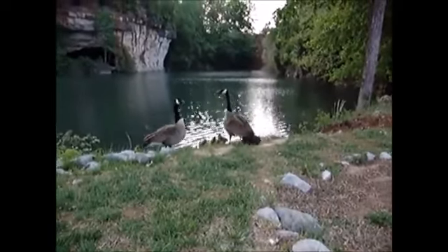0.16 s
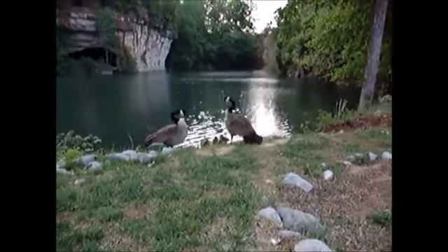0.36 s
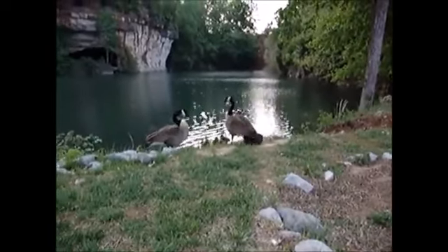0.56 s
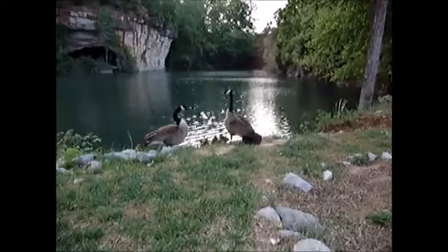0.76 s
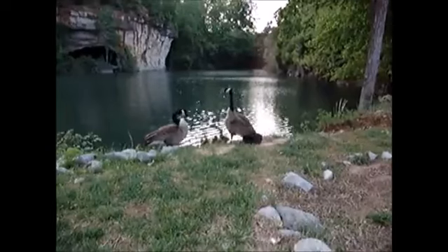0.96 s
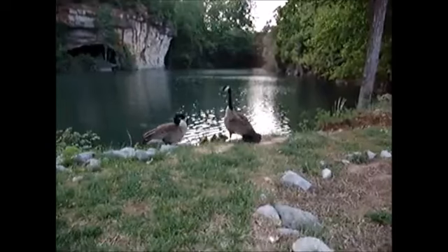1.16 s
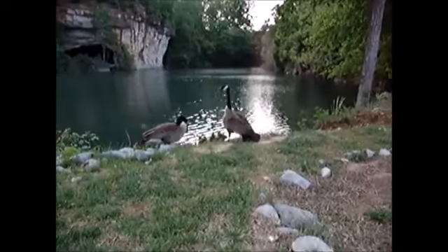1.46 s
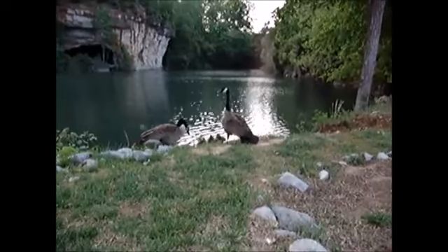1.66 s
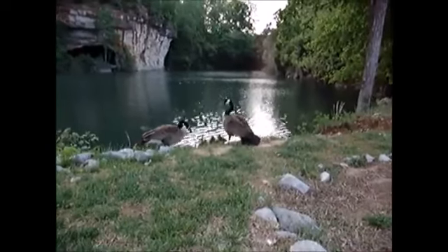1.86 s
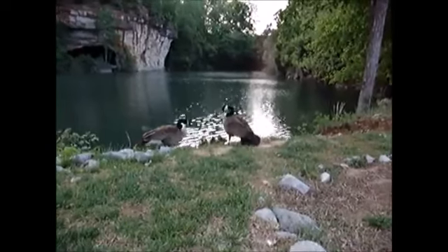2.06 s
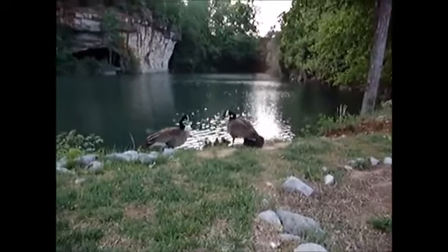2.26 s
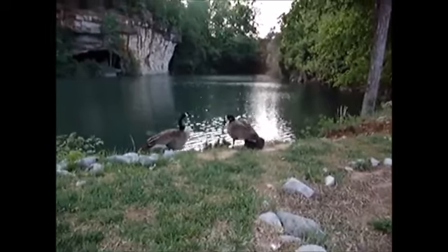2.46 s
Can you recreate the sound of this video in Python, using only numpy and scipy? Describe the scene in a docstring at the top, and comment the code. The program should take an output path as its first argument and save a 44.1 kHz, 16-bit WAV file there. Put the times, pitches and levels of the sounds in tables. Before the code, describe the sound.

A single goose honk comes right at the start, growling, cracking up to a clear note and echoing off rock and trees; then sparse faint birdsong and soft dull knocks over steady outdoor hush, heard in the open.

```python
"""On the bank of a pond a goose honks: a low pulsed growl swells, cracks and flips into one clear, sagging note.
Growl and crack are pulse trains ringing throat resonances; the note is a sum of overtones with a rasp.
Filtered delays and decaying noise return the honk from shore, bank, rock wall and trees.
Songbird whistles and thin peeps are gliding tones with a diffuse echo; soft low knocks are damped modes.
Coloured noises make the steady outdoor hush, its low rumble and a faint hiss."""
import sys
import numpy as np
from scipy import signal
from scipy.fft import rfft, irfft, next_fast_len
from scipy.io import wavfile
from scipy.ndimage import map_coordinates

SR = 44100
rng = np.random.default_rng(int(sys.argv[2]) if len(sys.argv) > 2 else 0)


def transcribe(u):
    """Save the signal u as a 16-bit wav file named by the first command-line argument.

    u: samples, shape (n,) or (channels, n), limited to [-1, 1]; the rate is SR.
    q: integer samples, one column per channel.
    """
    v = np.clip(np.atleast_2d(u).T, -1, 1)
    q = np.round(v * 32767).astype(np.int16)
    wavfile.write(sys.argv[1], SR, q)


N = 114660  # samples, 2.6 s

# Growl: pulse rate [t/s, f/Hz] and strength [t/s, level/dB]
GROWL_RATE = [(.09, 124), (.155, 130), (.2, 134), (.23, 143), (.252, 147)]
GROWL_LEVEL = [(.09, -41), (.14, -37.5), (.168, -26), (.198, -21.5), (.221, -20.5), (.238, -16),
               (.252, -16)]
# Throat resonances during the growl [f/Hz, width/Hz, relative level/dB]
THROAT = [(141, 100, -21), (272, 130, -18), (418, 215, -10.5), (1006, 140, -5), (1349, 216, 1.5),
          (1620, 150, -21.5), (2470, 410, -34), (3990, 300, -32)]
# Colour of the air puff let out by each growl pulse [f/Hz, relative level/dB]
PUFF = [(300, -26.5), (900, -7), (1550, 4), (2100, -8.5), (2800, -10), (3800, -4), (4600, -21), (6000, -40),
        (10000, -50.5)]
# Resonances of the wider throat during the crack [f/Hz, width/Hz, relative level/dB]
CRACK_THROAT = [(473, 57, -10), (619, 130, -8.5), (1013, 109, 0.5), (1215, 174, 3.5), (1440, 220, 1.5),
                (1610, 120, -9.5), (2530, 230, -23), (4870, 470, -28.5)]
# Overtones of the note [multiple of the pitch, level/dB, change of level at full sag/dB]
OVERTONES = [(1, -23.5, 4), (2, -0.5, 2), (3, -26, 0.5), (4, -31, 21), (5, -26.5, 13), (6, -40, 25),
             (7, -30, 7), (8, -44, 19), (9, -50.5, 0), (10, -48, -6), (12, -46, -7.5), (13, -64, 1)]
# Colour of the breathy rasp in the note [f/Hz, relative level/dB]
RASP = [(300, -16), (1400, -6.5), (2000, -12.5), (2900, 1.5), (3700, -7.5), (4900, -1), (6200, -15),
        (8000, -17.5), (10000, -25)]
# Colour of the bank's scatter: it returns the treble that the bill throws forward [f/Hz, relative level/dB]
BANK = [(200, -12), (640, 4.5), (950, -3), (1320, -14.5), (2000, 14.5), (2650, 10), (3300, 11), (4000, 7),
        (4650, 14), (5250, 15), (5900, 12), (9000, 12.5)]
# Colour of the rock wall's echo [f/Hz, relative level/dB]
CLIFF = [(200, -17.5), (450, -51), (660, 3.5), (950, -15), (1300, -28), (2000, -4.5), (3200, -3.5),
         (8000, -22)]
# Decay time of the trees' ringing [f/Hz, t60/s]
TREES = [(200, 1.8), (1300, 1.43), (3000, 4), (8000, 0.15)]
# Songbird whistles
# [t/s, length/s, first f/Hz, middle f/Hz, last f/Hz, level/dB, roughness 0-1]
WHISTLES = [(.14, 0.054, 2360, 2360, 2470, -42, .1), (.392, 0.025, 2680, 2610, 2460, -40, .3),
            (.595, 0.036, 2300, 2300, 2280, -44, .1), (.642, .026, 2300, 2446, 2440, -40, 0.22),
            (.702, 0.07, 2784, 2860, 3110, -39.5, 0.22), (.82, 0.026, 3070, 3020, 3060, -44, 0.24),
            (.853, 0.02, 2800, 2560, 2620, -37, 0.24), (.885, .075, 3400, 3570, 3500, -48.5, .9),
            (2.18, 0.032, 2590, 2750, 2750, -40, 0.19), (2.204, 0.042, 2840, 3012, 2920, -41, .15),
            (2.272, .058, 4100, 4060, 3980, -50, 0.2), (2.312, 0.065, 3950, 3550, 3160, -44.5, .45),
            (2.366, 0.019, 2780, 2645, 2550, -36.5, 0.14), (2.38, 0.045, 2540, 2480, 2490, -37, 0.05),
            (2.485, 0.051, 2200, 2190, 2240, -44, .2), (2.565, 0.053, 2550, 2750, 2680, -40, .25)]
# Thin high peeps
# [t/s, length/s, first f/Hz, middle f/Hz, last f/Hz, level/dB, roughness 0-1]
PEEPS = [(.29, 0.054, 5230, 5320, 5220, -41.5, 0.18), (.347, .02, 5300, 5220, 5050, -52, .4),
         (.82, 0.085, 4970, 5000, 4980, -58, .3), (1.786, .012, 8360, 7830, 7300, -49, .2),
         (1.795, 0.057, 7200, 7190, 7560, -45.5, .17), (2.203, 0.018, 4850, 5050, 5500, -48, .5),
         (2.205, 0.055, 4900, 4800, 4750, -54.5, .3)]
# Decay time of the small birds' echo [f/Hz, t60/s]
BIRD_ECHO = [(2500, 0.19), (8000, 0.39)]
# Soft low knocks [t/s, f of the middle mode/Hz, level before the envelope/dB]
KNOCKS = [(1.283, 127, -29), (1.33, 82, -34), (1.418, 85.5, -35), (1.464, 158, -29), (1.514, 164, -27),
          (1.545, 90, -35), (1.569, 250, -31.5), (1.677, 104, -36), (1.711, 151, -36), (1.744, 403, -32),
          (1.759, 450, -36), (1.757, 263, -31.5), (2.015, 99, -40), (2.388, 106, -36)]
# Colour of the outdoor hush [f/Hz, relative level/dB]
HUSH = [(25, -16), (50, -60.5), (90, -12.5), (220, -2.5), (350, -4.5), (600, -7), (1300, -5.5),
        (2500, -9.5), (3300, -14.5), (4200, -21.5), (6500, -27.5), (8500, -34), (10000, -63)]
# Rumble: colour [f/Hz, relative level/dB] and mean course [t/s, level/dB]
RUMBLE = [(30, -39), (60, -4.5), (90, 6), (170, 5.5), (230, 11), (320, 0), (500, -27.5)]
RUMBLE_LEVEL = [(0, -46.5), (.4, -50), (.7, -46.5), (1.2, -46.5), (1.52, -46), (1.85, -45.5), (2.05, -46.5),
                (2.22, -45), (2.6, -48)]
# Hiss: colour [f/Hz, relative level/dB] and course [t/s, level/dB]
HISS = [(2500, -13), (4500, -7), (6000, -7.5), (7400, -8.5), (8300, -7), (9200, -13.5), (10000, -31.5)]
HISS_LEVEL = [(0, -73.5), (.5, -64), (1.1, -72), (2.1, -67), (2.3, -55), (2.45, -54.5), (2.6, -68)]

# Growl: each pulse rebounds once and lets out a fading puff (fade in dB per pulse period)
REBOUND_S, REBOUND_DB, PUFF_DB, PUFF_FADE_DB = .0029, -21, -11.5, 16
THROAT_TOP_HZ = 5100
# Crack: start, end, mean pulse rate, level, timing scatter as a fraction of the period
CRACK_S, CRACK_END_S, CRACK_HZ, CRACK_DB, CRACK_JITTER = .2402, .2595, 286, -11.8, .11
# Note: held pitch, its drop by the end, time constant of the drop
NOTE_HZ, SAG_HZ, SAG_S = 665, 118, .0075
NOTE_S, NOTE_END_S, NOTE_ATTACK_S, NOTE_RELEASE_S, NOTE_DB = .2545, .3055, .007, .009, -9.4
# Unsteadiness: pitch scatter as a fraction, upper-overtone flutter, settling time constant
NOTE_JITTER, FLUTTER_DB, SETTLE_S = .005, 1.5, .003
# Rasp: level factor, and the share that stays while the note is steady
NOTE_RASP_DB, RASP_HELD = -25, .1
DULL_DB = 24  # the overtones die before the fundamental as the push ends
# Returns of the honk: delay, t60, level
SHORE_S, SHORE_T60, SHORE_DB = .012, .013, -26.5
BANK_S, BANK_T60, BANK_DB = .04, .16, -18.5
CLIFF_S, CLIFF_DB, CLIFF_SMEAR_DB = .19, -11, -12  # the smear is relative to the echo
TREES_DB, LEAF_BLUR = -26, 1.2  # blur: phase swing in radians
# Small birds: pitch waver as a fraction (at roughness 1), level flutter, gains into the echo
BIRD_WAVER, BIRD_FLUTTER_DB, BIRD_WET_DB, PEEP_WET_DB = .045, 1.3, -.5, -6.5
KNOCK_T60, KNOCK_ATTACK_S = .064, .0023  # seconds
HUSH_DB, TOP_HZ = -40.5, 10050


def growl(scatter_db=0.5, jitter_s=.00003):
    """Source and filter: syrinx pulses, growing stronger and a little faster, excite the throat and let out air."""
    rate, db = curves(GROWL_RATE)[0], curves(GROWL_LEVEL)[0]
    sounding = (clock() > GROWL_RATE[0][0]) * (clock() < GROWL_RATE[-1][0])
    cycles = np.cumsum(rate * sounding) / SR + 1 / 4
    at = np.flatnonzero(np.diff(np.floor(cycles)))  # one pulse at each whole cycle
    size, late, rebound_late = rng.standard_normal((len(at), 3)).T
    times = at / SR + jitter_s * late
    # the root keeps the mean power independent of the pulse rate
    sizes = amp(db[at] + scatter_db * size) * np.sqrt(SR / rate[at])
    pulses = voiced(times, sizes, THROAT)
    rebounds = voiced(times + REBOUND_S + jitter_s * rebound_late, amp(REBOUND_DB) * sizes, THROAT)
    puff_level = amp(db + PUFF_DB - PUFF_FADE_DB * (cycles % 1)) * sounding
    return pulses + rebounds + puff_level * noise(PUFF)


def crack():
    """Register transition: between two regimes the pulses come hard and uneven, under a steady push."""
    beats = np.arange(CRACK_S, CRACK_END_S, 1 / CRACK_HZ)
    timing, size_db = rng.standard_normal((len(beats), 2)).T
    burst = voiced(beats + CRACK_JITTER * timing / CRACK_HZ, amp(size_db), CRACK_THROAT)
    level = np.sqrt((CRACK_END_S - CRACK_S) * SR / np.sum(burst ** 2))
    return amp(CRACK_DB) * level * burst


def note():
    """Harmonic series: the throat favours the second harmonic; rough at first, clear, then frayed by the sag."""
    t = clock()
    sag = np.exp(np.minimum(t - NOTE_END_S, 0) / SAG_S)  # 0 to 1
    unsteady = np.exp(-np.maximum(t - CRACK_END_S, 0) / SETTLE_S) + np.sqrt(sag)
    pitch = (NOTE_HZ - SAG_HZ * sag) * (1 + NOTE_JITTER * unsteady * wobble(900))
    phase = 2 * np.pi * np.cumsum(pitch) / SR
    tone = 0
    for k, db, sag_db in OVERTONES:
        # the pitch sags off the throat's resonances, so each overtone changes level
        flutter_db = FLUTTER_DB * (k > 2) * wobble(160)
        dull_db = DULL_DB * (k > 1) * sag ** 2
        level = amp(db + sag_db * sag - dull_db + flutter_db)
        tone = tone + level * np.sin(k * phase + rng.uniform(0, 2 * np.pi))
    rasp_level = amp(NOTE_RASP_DB - DULL_DB * sag ** 2) * (RASP_HELD + unsteady ** 2)
    rasp = rasp_level * noise(RASP) * (1 + np.cos(phase))  # pulsing once a cycle
    envelope = gate(NOTE_S, NOTE_END_S + NOTE_RELEASE_S / 2, NOTE_ATTACK_S, NOTE_RELEASE_S)
    return amp(NOTE_DB) * envelope * (np.sqrt(2) * tone + rasp)


def pond(honk):
    """Reflection and scattering: shore and bank scatter the honk, the rock wall returns it, the trees ring on."""
    shore = reverb(echo(honk, [(1000, SHORE_DB)], SHORE_S), [(1000, SHORE_T60)], onset_s=0.0018)
    bank = reverb(echo(honk, BANK, BANK_S), [(1000, BANK_T60)], onset_s=0.012)
    cliff = echo(honk, CLIFF, CLIFF_S)
    ledges = reverb(cliff, [(1000, 0.68)], onset_s=0.025)
    wall = amp(CLIFF_DB) * (cliff + amp(CLIFF_SMEAR_DB) * ledges)
    return shore + amp(BANK_DB) * bank + amp(TREES_DB) * trees(honk) + wall


def trees(honk, count=4):
    """Phase modulation of diffuse tails: swaying leaves blur the pitch of several ringing stands."""
    blurred = 0
    for _ in range(count):
        tail = signal.hilbert(reverb(honk, TREES, onset_s=0.045), next_fast_len(N))[:N]
        blurred = blurred + np.real(tail * np.exp(1j * LEAF_BLUR * wobble(110)))
    return blurred / np.sqrt(count)


def birds(calls, rise=0.2, fall=0.2):
    """Frequency modulation: each call is one wavering tone gliding through three pitches."""
    out = np.zeros(N)
    for s, length, first, middle, last, db, rough in calls:
        progress = np.clip((clock() - s) / length, 0, 1)
        glide = np.polyval(np.polyfit([0, .5, 1], [first, middle, last], 2), progress)
        hz = glide * (1 + BIRD_WAVER * rough * wobble(600))
        envelope = gate(s, s + length, rise * length, fall * length)
        level = amp(db + BIRD_FLUTTER_DB * wobble(110)) * envelope
        out += level * np.sin(2 * np.pi * np.cumsum(hz) / SR)
    return out


def knocks(spread=0.2):
    """Damped modal vibration: each dull bump is a cluster of three low, quickly decaying modes."""
    out = np.zeros(N)
    for s, hz, db in KNOCKS:
        t = np.maximum(clock() - s, 0)
        ring = 0
        for k in (-1, 0, 1):
            mode_hz = hz * np.exp(spread * k)
            mode = np.sin(2 * np.pi * mode_hz * t + rng.uniform(0, 2 * np.pi))
            ring = ring + mode * .5 ** abs(k)
        out += amp(db - 60 * t / KNOCK_T60) * (1 - np.exp(-t / KNOCK_ATTACK_S)) * ring
    return out


def air(hush_sway_db=0.5, rumble_sway_db=2):
    """Coloured noise: a steady outdoor hush with a slowly swelling rumble and a faint high hiss."""
    hush = amp(HUSH_DB + hush_sway_db * wobble(5.84)) * noise(HUSH)
    rumble = amp(curves(RUMBLE_LEVEL)[0] + rumble_sway_db * wobble(12.4)) * noise(RUMBLE)
    hiss = amp(curves(HISS_LEVEL)[0]) * noise(HISS)
    return hush + rumble + hiss


def voiced(times, sizes, throat):
    """Resonance: pulses ring the throat's steep modes; a pulse of size 1 carries unit energy."""
    pulses = np.bincount(np.round(times * SR).astype(int), sizes, N)[:N]

    def response(f):
        ring = 0
        for centre, width, db in throat:
            resonance = 1j * f * width / (centre * centre - f * f + 1j * f * width)
            ring = ring + amp(db) * resonance ** 2
        return unit(ring / np.sqrt(1 + (f / THROAT_TOP_HZ) ** 10))

    return filtered(pulses, response)


def echo(x, colour, delay_s):
    """Specular reflection: one coloured, delayed copy, the delay being a linear phase."""
    return filtered(x, lambda hz: amp(along(colour, hz)) * np.exp(-2j * np.pi * hz * delay_s))


def reverb(x, t60s, onset_s):
    """Diffuse decay: a noise tail of unit energy in which each frequency dies at its own speed."""
    hz, t, z = signal.stft(rng.standard_normal(SR), SR, nperseg=256)
    decay = amp(-60 * t / along(t60s, hz)[:, None])
    onset = 1 - np.exp(-t / onset_s)
    tail = signal.istft(z * decay * onset, SR, nperseg=256)[1]
    return signal.fftconvolve(x, tail / np.linalg.norm(tail))[:N]


def noise(spectrum):
    """Spectral shaping: white noise coloured by a level curve, at rms 1."""
    return unit(filtered(rng.standard_normal(N), lambda hz: amp(along(spectrum, hz))))


def filtered(x, response):
    """Linear filtering: the spectrum of x times a response of frequency."""
    m = next_fast_len(N + SR // 2)  # padded against wrap-around
    return irfft(rfft(x, m) * response(np.fft.rfftfreq(m, 1 / SR)), m)[:N]


def gate(start, end, attack, release):
    """Amplitude envelope: a smooth rise, a hold and a smooth fall."""
    t = clock()
    rise = np.sin(np.pi / 2 * np.clip((t - start) / attack, 0, 1)) ** 2
    fall = np.sin(np.pi / 2 * np.clip((end - t) / release, 0, 1)) ** 2
    return rise * fall


def wobble(rate):
    """Random modulation: a smooth curve with rate knots a second."""
    return map_coordinates(rng.standard_normal(int(N * rate / SR) + 4), [clock() * rate])


def curves(rows):
    """Linear interpolation in time: one value per sample for each column after t/s."""
    s, *cols = np.transpose(rows)
    return [np.interp(clock(), s, c) for c in cols]


def along(points, hz):
    """Interpolation of (f/Hz, value) points on a logarithmic frequency axis."""
    f, v = np.transpose(points)
    return np.interp(np.log(hz + 1), np.log(f + 1), v)


def clock():
    """Sampling: the time of each sample in seconds."""
    return np.arange(N) / SR


def unit(x):
    """Normalisation to rms 1."""
    return x / np.sqrt(np.mean(np.abs(x) ** 2) + 1e-20)


def amp(db):
    """Logarithmic level: decibels to amplitude gain."""
    return 10 ** (np.asarray(db) / 20)


def scene():
    """Superposition: the goose and its echoes, the small birds, the knocks and the open air."""
    honk = growl() + crack() + note()
    whistles, peeps = birds(WHISTLES), birds(PEEPS)
    bird_send = amp(BIRD_WET_DB) * whistles + amp(PEEP_WET_DB) * peeps
    bird_echo = reverb(bird_send, BIRD_ECHO, onset_s=0.02)
    return (honk + pond(honk) + whistles + peeps + bird_echo + knocks() + air())[None]


def record(dry):
    """Band limitation: an abrupt low-pass keeps nothing above the top frequency."""
    return filtered(dry[0], lambda hz: hz < TOP_HZ)[None]


dry = scene()
out = record(dry)
transcribe(out)
```